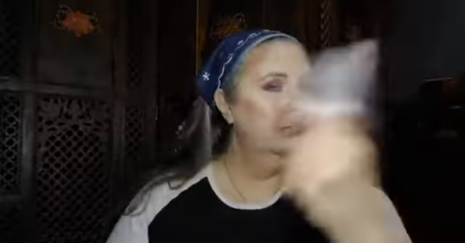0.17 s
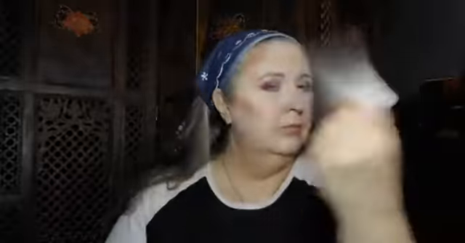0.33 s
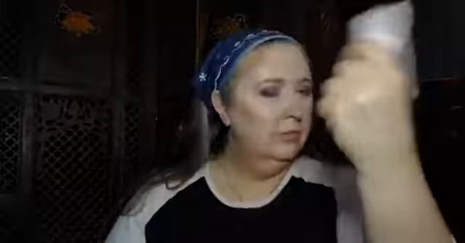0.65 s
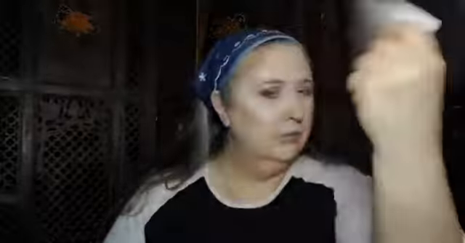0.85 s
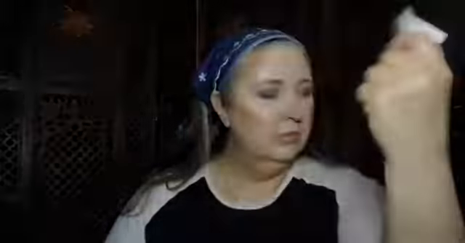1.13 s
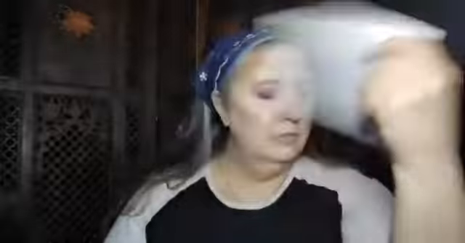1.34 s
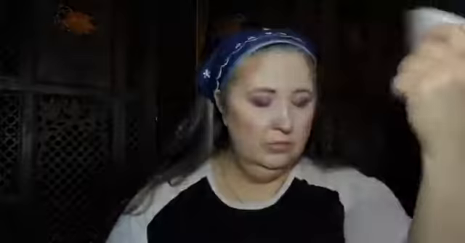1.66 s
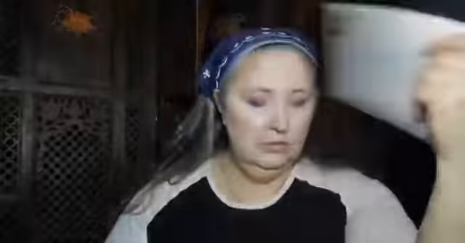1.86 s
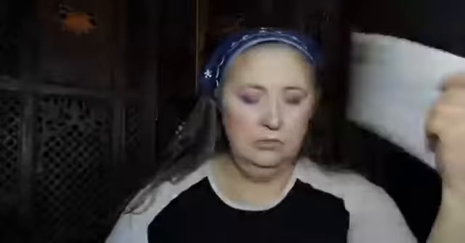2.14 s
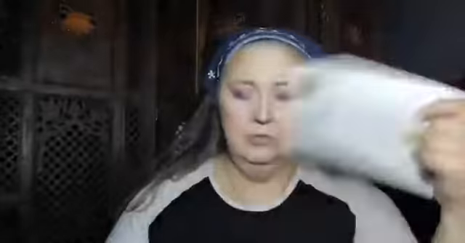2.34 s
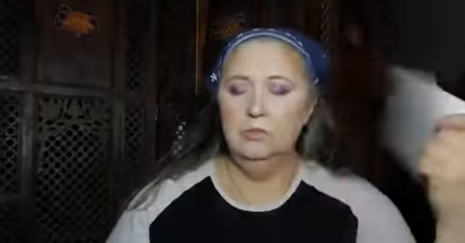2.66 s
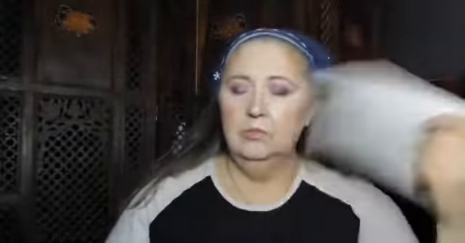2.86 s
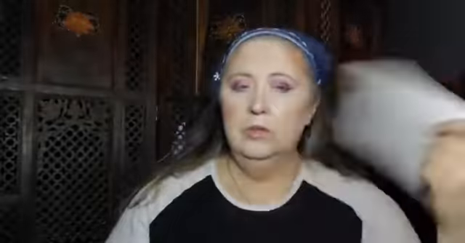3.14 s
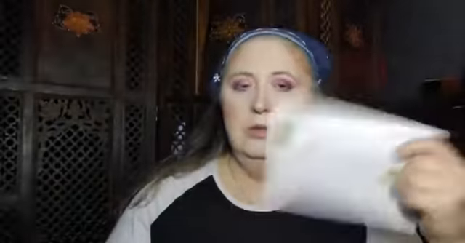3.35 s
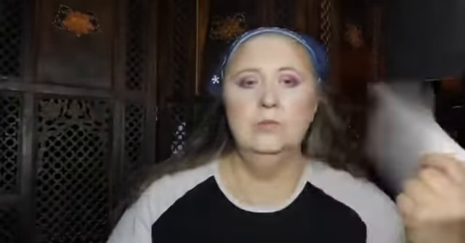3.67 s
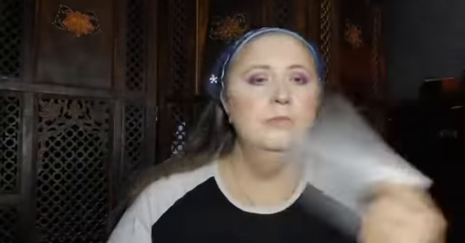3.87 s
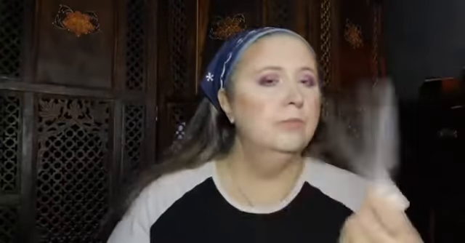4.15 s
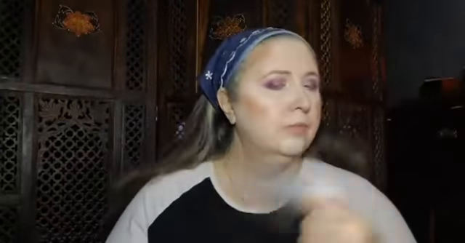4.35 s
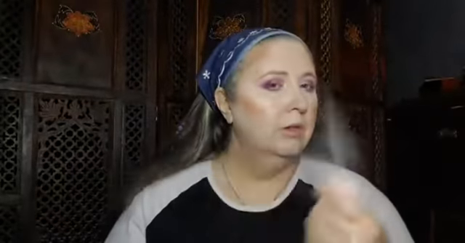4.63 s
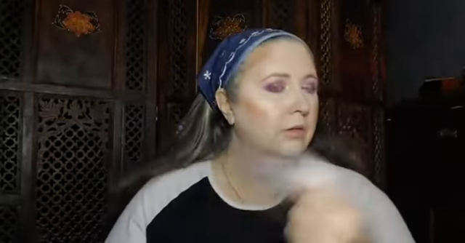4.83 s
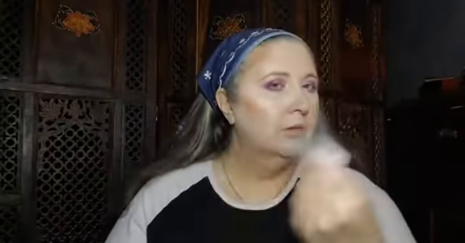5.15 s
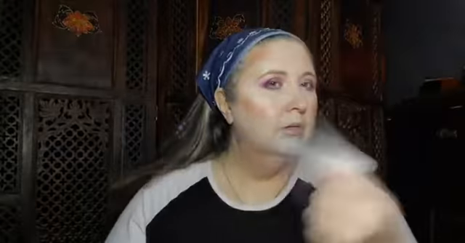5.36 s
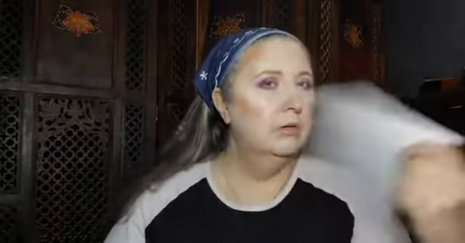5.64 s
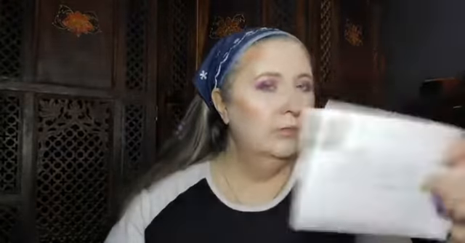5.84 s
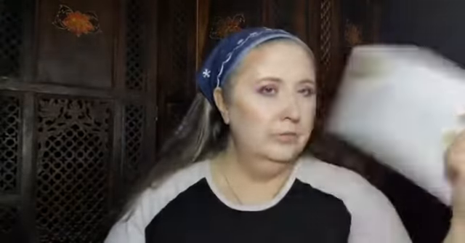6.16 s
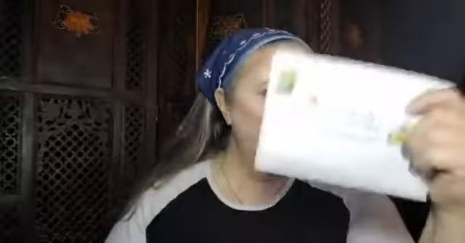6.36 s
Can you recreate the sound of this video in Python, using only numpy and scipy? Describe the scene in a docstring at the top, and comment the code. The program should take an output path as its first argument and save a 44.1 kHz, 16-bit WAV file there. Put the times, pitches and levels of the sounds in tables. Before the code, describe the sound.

A stiff paper envelope is fanned by hand close to the microphone, from the start until about 6.3 seconds, at an even four strokes a second. Each stroke is a low, soft puff of air with a short papery rustle, followed at once by a dry flick of the free edge, a slight quiver and a faint swish. The first two strokes are light; from about 0.6 to 3 seconds the flapping is strongest and the flicks are crispest. Between 3 and 4.5 seconds the flicks turn into softer, looser crinkles while the puffs continue. At about 4.7 seconds the envelope buckles with a sharp snap, and again at 5.7 seconds with more of a thump; each snap is followed by a weak, limp stroke. One firmer flap comes near 6.3 seconds. The room is small and fairly dry, with a faint, steady low rumble throughout.

```python
"""Fanning a paper envelope

A stiff envelope is waved by hand about four times a second, close to the microphone in a quiet room.
Each stroke pushes a puff of air and makes the paper rustle. The free edge flicks back about 50 ms later,
and the sheet quivers, then swishes on the return. Twice it buckles with a sharp snap.
Under it all lies the low rumble of the room."""
import sys
import numpy as np
from scipy import signal
from scipy.fft import rfft, irfft
from scipy.io import wavfile
from scipy.ndimage import map_coordinates

SR = 44100
rng = np.random.default_rng(int(sys.argv[2]) if len(sys.argv) > 2 else 0)


def store_wav(level_fs):
    """Save 16-bit WAV to argv[1]."""
    pcm = np.round(np.clip(np.atleast_2d(level_fs), -1, 1) * 32767)
    wavfile.write(sys.argv[1], SR, pcm.T.astype(np.int16))


N = 286650
TIME = np.arange(N) / SR

# each turn of the hand: t/s, strength/dB (0 is a firm stroke)
STROKES = [(.116, -2.5), (.374, -6), (.632, 1.1), (.878, 1.5), (1.132, 0), (1.388, 2), (1.645, 0),
           (1.907, 1.44), (2.155, -2.5), (2.420, 2), (2.675, 2), (2.925, 3.5), (3.183, -0.5), (3.437, -.5),
           (3.692, 0.3), (3.935, -1), (4.179, -1.5), (4.433, -2.5), (4.686, 0), (4.939, -6), (5.207, -3.5),
           (5.453, -1.5), (5.704, 0), (5.993, -6.5), (6.257, .5)]
# each time the sheet buckles: t/s, relative crack level/dB, relative thump level/dB, crack decay/s
SNAPS = [(4.7035, -23.5, -21.5, 0.0042), (5.7133, -26.5, -16, 0.0092)]
# the tone of flicking and quivering paper: f/Hz, relative level/dB
FLICK_TONE = [(100, -2.5), (300, 4.5), (550, 9.5), (850, -3.5), (1400, -3), (2200, -2), (3500, 1.5),
              (5000, -2), (6500, -6.5), (10000, -13), (16000, -16)]


def colour(x, points, unit_power=True):
    """Filters x along a curve of (f/Hz, level/dB) points; by default white noise keeps its power."""
    size = 16384
    hz, db = np.transpose(points)
    bin_hz = np.arange(size // 2 + 1) * SR / size
    gain = from_db(np.interp(np.log(bin_hz + 1), np.log(hz), db))
    if unit_power:
        gain = gain / np.sqrt(np.mean(gain ** 2))
    # minimum phase: the filter never sounds ahead of its input
    cepstrum = irfft(np.log(gain))[:size // 2]
    cepstrum[1:] *= 2
    response = irfft(np.exp(rfft(cepstrum, size)))[:size // 2]
    return signal.fftconvolve(np.atleast_2d(x), response[None], axes=1)[:, :N]


def from_db(db):
    """Turns decibels into a factor to multiply by."""
    return 10 ** (np.asarray(db) / 20)


def on_events(times, levels_db, shape):
    """Adds shape(seconds from the event) at each time and level."""
    out = np.zeros(N)
    for at, db in zip(times, levels_db):
        near = slice(max(0, int((at - .1) * SR)), int((at + .25) * SR))
        out[near] += from_db(db) * shape(TIME[near] - at)
    return out


def swell(t, rise, fall):
    """Grows towards t = 0 and dies away after it; rise and fall are in seconds."""
    return np.exp(np.minimum(t / rise, -t / fall))


def bell(t, width):
    """A smooth hump around t = 0; width is in seconds."""
    return np.exp(-.5 * (t / width) ** 2)


def push(t, width):
    """A short force whose samples add up to 1."""
    return bell(t, width) / (width * SR * np.sqrt(2 * np.pi))


def paper_noise(grain_db, split_hz=1300):
    """Countless small fibres crackle: the same left and right in the bass, different in the treble."""
    white = rng.standard_normal((3, N))
    grain_samples = 12
    grains = from_db(grain_db * rng.standard_normal(N // grain_samples + 1))
    grains = np.repeat(grains, grain_samples)[:N]
    crackle = white * grains / np.sqrt(np.mean(grains ** 2))
    bass = signal.sosfilt(signal.butter(2, split_hz, fs=SR, output="sos"), crackle[0])
    treble = signal.sosfilt(signal.butter(2, split_hz, "high", fs=SR, output="sos"), crackle[1:])
    return bass + treble


def strokes(limp_db=-13):
    """The state of the sheet at each turn: t/s, strength/dB, slack/dB, buckles (0 or 1), limpness/dB."""
    # how loosely the hand holds the sheet: t/s, slack/dB
    grip = [(0, -2.5), (.63, -1.5), (.88, 3.5), (1.39, 0.5), (1.65, 5), (1.91, 3), (2.16, -2), (2.93, -6.5),
            (3.7, -10.5), (4.45, -3), (6.3, -1.5)]
    turns, strength = np.transpose(STROKES)
    slack = np.interp(turns, *np.transpose(grip))
    buckles = np.zeros(len(turns))
    buckles[[np.argmin(abs(turns - snap[0])) for snap in SNAPS]] = 1
    limp = limp_db * np.r_[0, buckles[:-1]]  # a buckled sheet is limp for the next stroke
    return turns, strength, slack, buckles, limp


def room_rumble(rumble_db=-51, apart_db=-16):
    """The room rumbles softly, nearly the same left and right."""
    # the tone of the rumble: f/Hz, relative level/dB
    rumble_tone = [(15, -40), (28, -25), (42, 3), (56, 6), (75, -1), (120, 3), (145, -10), (170, -6),
                   (205, -17.5), (320, -14), (390, -20.5), (570, -24.5), (850, -37.5), (2000, -45.5)]
    air = rng.standard_normal(N) + from_db(apart_db) * rng.standard_normal((2, N))
    return from_db(rumble_db) * colour(air, rumble_tone)


def swishes(swish_db=-67, delay_s=.16, loss_per_slack=.23):
    """The return stroke is a soft slide of air and paper, fastest between two turns."""
    # the tone of the swish: f/Hz, relative level/dB
    swish_tone = [(100, 13), (500, 10.5), (1000, -10), (2200, -3), (5000, -0.5), (9000, -5.5), (16000, -7)]
    turns, _, slack, _, _ = strokes()
    turns = np.r_[2 * turns[0] - turns[1], turns]  # one turn earlier: the waving is already under way
    levels_db = swish_db - loss_per_slack * np.r_[slack[0], slack]
    speed = on_events(turns + delay_s, levels_db,
                      lambda t: .84 * bell(t, width=.032) + .48 * bell(t + .038, width=.052))
    return colour(speed * paper_noise(grain_db=3.5), swish_tone)


def rustles(rustle_db=-45, knock_db=-42.5):
    """At each turn the sheet bends with a scuff, its layers slide, and the soft jolt makes it ring."""
    def rub(t):
        scuff = .6 * bell(t + .0025, width=.0055)
        slide = .45 * bell(t - .007, width=.0072)
        return scuff + slide + .34 * swell(t, rise=.014, fall=.046)

    # the tone of bending paper: f/Hz, relative level/dB
    rustle_tone = [(100, -5.5), (220, 9.5), (320, 15), (430, 5), (600, 13.5), (900, -9), (1400, 0),
                   (2100, 2), (3200, -4), (5000, 0.5), (10000, -6.5), (16000, -10.5)]
    turns, strength = np.transpose(STROKES)
    _, air_db = air_pushed()
    rustle = on_events(turns, strength, rub) * paper_noise(grain_db=4.4)
    knock = on_events(turns - .006, air_db + knock_db, lambda t: push(t, width=.0003))
    return from_db(rustle_db) * colour(rustle, rustle_tone) + ring(knock)


def ring(force):
    """A knock makes the envelope and the space around it ring at several pitches."""
    # the ringing tones: f/Hz, level for a click of size 1/dB, time to fade by 60 dB/s
    modes = [(192, -6.5, 0.049), (339.3, -7.5, 0.066), (543, -1.5, 0.033), (566, -5.5, 0.036),
             (1220, -9.5, 0.1), (1284, -15.5, 0.045), (1600, -10.5, .04), (2054, 4.5, 0.028),
             (2900, -28, 0.05)]
    out = 0
    for hz, db, fade_s in modes:
        decay = np.exp(-np.log(1000) / (fade_s * SR))
        angle = 2 * np.pi * hz / SR
        feedback = [1, -2 * decay * np.cos(angle), decay * decay]
        out = out + from_db(db) * signal.lfilter([0, np.sin(angle)], feedback, force + 1e-18)
    return out


def air_pushed(gain_per_strength=1.1, loss_per_slack=.45):
    """A strong stroke and a taut sheet move more air. For each turn: t/s, relative level/dB."""
    turns, strength, slack, _, limp = strokes()
    return turns, gain_per_strength * strength - loss_per_slack * slack + limp


def puffs(puff_hz=100, puff_db=-32):
    """At each turn the envelope squeezes the air: one swing of pressure."""
    turns, air_db = air_pushed()
    return on_events(turns, air_db + puff_db,
                     lambda t: bell(t, width=.0043) * np.sin(2 * np.pi * puff_hz * t))


def edge_returns(lag_s=.0525, bounce_s=.034, edge_db=-44, bounce_db=-54.5):
    """The edge whips back after each turn and bounces once. For each of these: t/s, relative level/dB."""
    turns, strength, slack, buckles, limp = strokes()
    # a strong stroke, a slack grip or a buckle makes the flick later and harder
    back = turns + lag_s + .0016 * strength + .00039 * slack + .034 * buckles
    back_db = edge_db + strength + slack + 4 * buckles + limp
    again = back + bounce_s + .0021 * rng.standard_normal(len(turns))
    again_db = bounce_db + strength + .32 * slack + limp
    return [*zip(back, back_db), *zip(again, again_db)]


def flicks(tick_db=3.5, knock_db=-8, click_db=12, loose_below_db=-47):
    """The free edge springs back: a hard flick is one dry click, a soft one a looser crinkle."""
    tick, knock, click = 0, 0, 0
    for at, db in edge_returns():
        loose = 1 + 3 / (1 + from_db(2 * (db - loose_below_db)))  # from 1 (hard) to 4 (soft)

        def crinkle(t):
            burst = swell(t, rise=.0005 * loose, fall=.0024 * loose) / loose
            return burst + .16 * swell(t, rise=.0031, fall=.019)

        tick += on_events([at + .00081], [db + tick_db], crinkle)
        knock += on_events([at], [db + knock_db], lambda t: push(t, width=.00007))
        click += on_events([at + .000578], [db + click_db], lambda t: bell(t, width=.00003) / loose ** 2)
    return colour(tick * paper_noise(grain_db=1.5) + click, FLICK_TONE) + ring(knock)


def flutter(flutter_db=-59, delay_s=.058, creases_per_s=110, crease_db=5, crease_s=.003):
    """After each turn the sheet quivers and small creases give way, louder the harder it was bent."""
    turns, strength = np.transpose(STROKES)
    quiver = on_events(turns + delay_s, strength + flutter_db, lambda t: swell(t, rise=.03, fall=.054))
    gives_way = rng.random(N) < creases_per_s / SR
    pops = gives_way * rng.random(N) * from_db(crease_db)
    creases = signal.lfilter([1], [1, -np.exp(-1 / (crease_s * SR))], pops + 1e-18)  # each pop fades
    return colour(quiver * (.5 + creases) * paper_noise(grain_db=-1), FLICK_TONE)


def flexing(x, bands=10, spread_db=2.8, step_s=.025):
    """As the sheet flexes, each part of its treble comes out now louder, now softer."""
    steps = np.arange(0, TIME[-1], step_s)
    centres_hz = np.geomspace(600, 12000, bands)
    spectrum, hz = rfft(x), np.fft.rfftfreq(N, 1 / SR)
    out = x.copy()
    for band in np.eye(bands)[1:]:  # the lowest band stays steady
        gain = from_db(np.interp(TIME, steps, spread_db * rng.standard_normal(len(steps))))
        part = irfft(spectrum * np.interp(hz, centres_hz, band), N)
        out += (gain - 1) * part
    return out


def near_echoes(x, count=3, echo_db=-8, wander=.06):
    """Face, arm and desk throw back the treble a few ms late; the paths shift a little every stroke."""
    treble = signal.sosfilt(signal.butter(2, [1200, 8000], "band", fs=SR, output="sos"), x)
    turns = np.transpose(STROKES)[0]
    out = x.copy()
    for side in range(2):
        for delay_s in rng.uniform(.001028, .005, count):
            stretch = np.interp(TIME, turns, 1 + wander * rng.standard_normal(len(turns)))
            echo = map_coordinates(treble[side], [(TIME - delay_s * stretch) * SR], order=1)
            out[side] += from_db(echo_db) * echo
    return out


def room_echo(x, echo_db=-14, fade_s=.28, first_echo_s=.0067, band_hz=(350, 6000)):
    """A small furnished room adds a short, dull tail, different left and right."""
    t = TIME[:SR // 2]
    fade = np.exp(-np.log(1000) * t / fade_s) * (t > first_echo_s)  # 60 dB down after fade_s
    tail = rng.standard_normal((2, len(t))) * fade
    tail = tail / np.sqrt(np.sum(tail ** 2, axis=1, keepdims=True))
    tail = signal.sosfilt(signal.butter(1, band_hz, "band", fs=SR, output="sos"), tail)
    return from_db(echo_db) * signal.fftconvolve(x, tail, axes=1)[:, :N]


def snaps(crack_gain_db=3, ring_db=-2, air_db=-9, air_hz=56):
    """The sheet buckles and pops through: a dense crack, a short ring and a thump of air."""
    # the tone of the crack: f/Hz, relative level/dB
    crack_tone = [(100, -11.5), (270, -8), (550, 7), (750, -6.5), (1000, -18.5), (1300, 2.5), (2000, -6),
                  (2700, -2), (5000, -2.5), (9000, -10.5), (16000, -15.5)]
    crack, force, air = 0, 0, 0
    for at, crack_db, thump_db, decay_s in SNAPS:
        crack += on_events([at + .0012], [crack_db + crack_gain_db],
                           lambda t: swell(t, .0005, decay_s) + .099 * swell(t, rise=.0005, fall=.043))
        force += on_events([at], [thump_db + ring_db], lambda t: push(t, width=.00016))
        air += on_events([at + .0078], [thump_db + air_db],
                         lambda t: swell(t, rise=.0065, fall=.018) * np.sin(2 * np.pi * air_hz * t))
    return colour(crack * paper_noise(grain_db=2.5), crack_tone) + ring(force) + air


def scene():
    """The waved envelope in its room, drifting a little from side to side."""
    # where the hand is: t/s, left minus right level/dB
    hand_place = [(0, 1), (.8, 0), (1.8, 1.1), (2.7, 2), (3.8, 0.5), (5.1, 1), (6.5, 1.7)]
    soft_sounds = flexing(rustles() + swishes() + flutter())
    paper = near_echoes(soft_sounds + flicks() + snaps())
    balance_db = np.interp(TIME, *np.transpose(hand_place))
    pan = from_db(balance_db * [[.5], [-.5]])
    return pan * (paper + puffs()) + room_echo(paper) + room_rumble()


def record(dry, hiss_db=-77, cutoff_hz=15900):
    """Each side of the microphone has its own tone and a faint hiss; the highest treble is cut."""
    # the tone of the left and right microphone openings: f/Hz, level/dB
    left_tone = [(60, -1), (600, -2.5), (1200, -6.5), (2000, -1), (3000, -5), (3900, -6.5), (4800, -3),
                 (6000, -6.5), (7500, 1.5), (8200, 0), (8900, -13.5), (10700, -4), (12000, -1),
                 (16000, 2.5)]
    right_tone = [(60, 0.5), (600, 3.5), (1300, -0.5), (2100, 0), (3100, -5), (4400, -1), (5200, -4),
                  (6100, -7.5), (7400, -2.5), (8050, -6), (8800, 6), (10500, 2.5), (13000, 4),
                  (16000, -2.5)]
    sides = [colour(x, tone, unit_power=False)[0] for x, tone in zip(dry, (left_tone, right_tone))]
    hiss = from_db(hiss_db) * rng.standard_normal((2, N))
    return signal.sosfilt(signal.ellip(12, .1, 80, cutoff_hz, fs=SR, output="sos"), sides + hiss)


dry = scene()
out = record(dry)
store_wav(out)
```